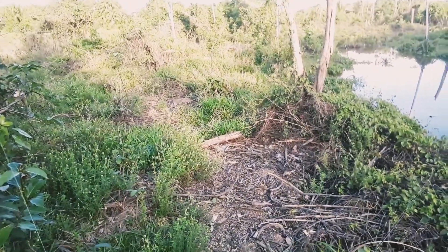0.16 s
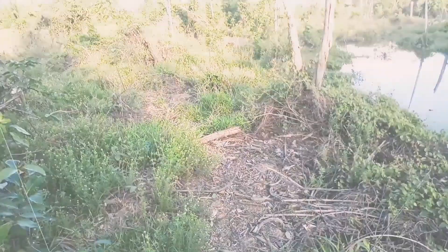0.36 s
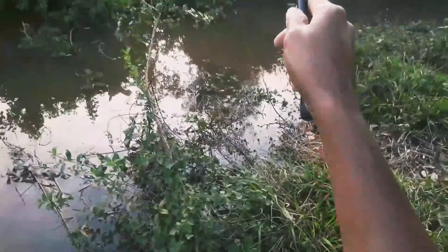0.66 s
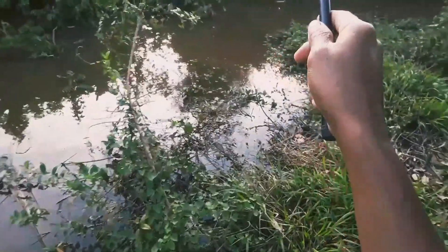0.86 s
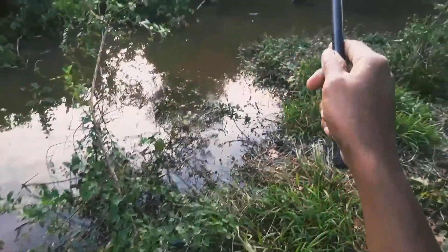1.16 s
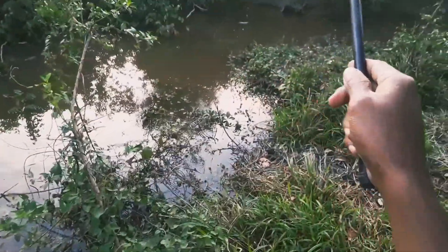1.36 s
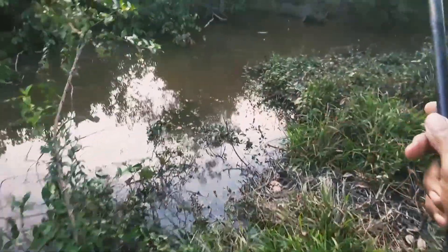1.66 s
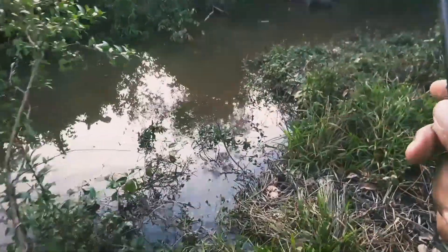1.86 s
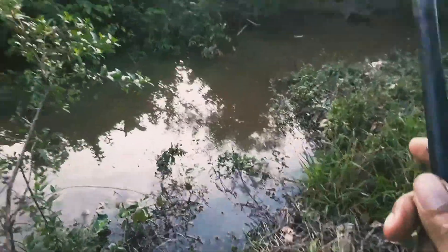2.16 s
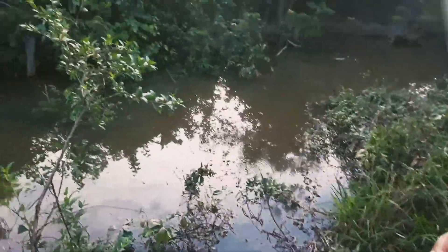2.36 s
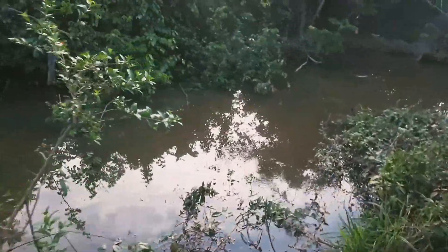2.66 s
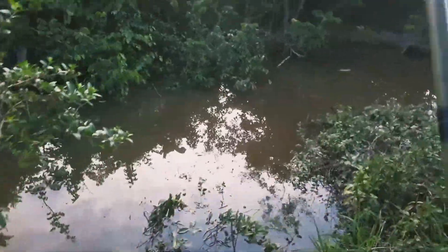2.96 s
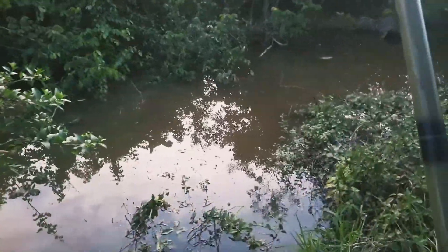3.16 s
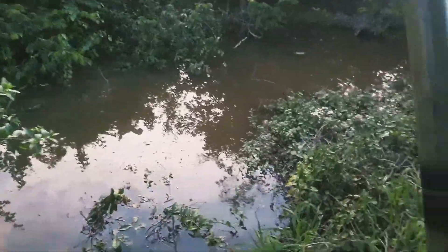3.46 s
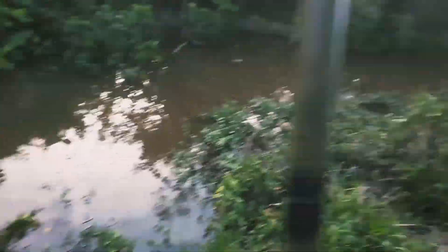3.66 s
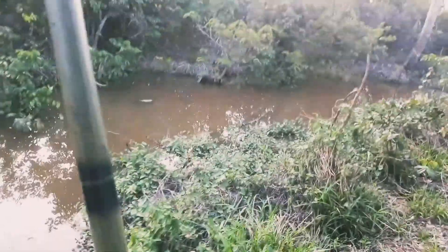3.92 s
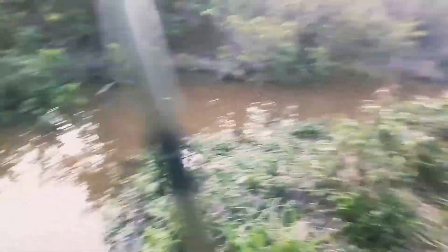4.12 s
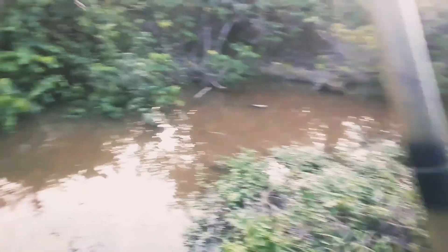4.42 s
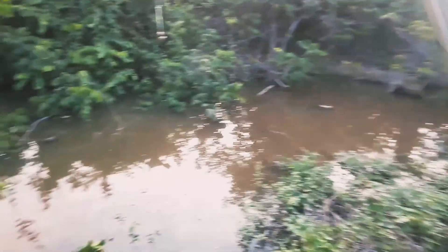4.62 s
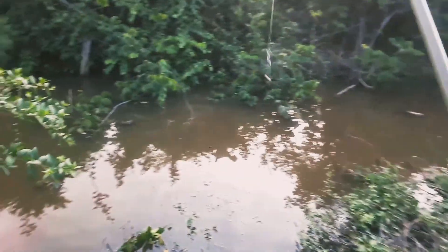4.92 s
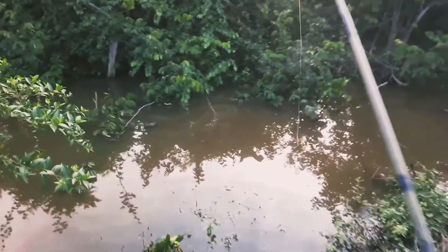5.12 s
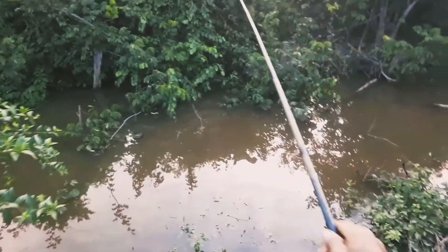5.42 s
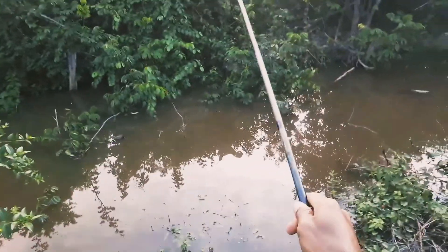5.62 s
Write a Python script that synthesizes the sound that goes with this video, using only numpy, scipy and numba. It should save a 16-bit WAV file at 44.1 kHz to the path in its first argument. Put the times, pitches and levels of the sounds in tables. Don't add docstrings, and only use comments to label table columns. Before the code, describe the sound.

First a soft airy hush with insect chirps and faint bird buzzes; then irregular rustling and crackling of undergrowth on a bank. The snaps cluster heavily in the first two seconds, thin to lighter swishes and ticks, nearly pause after four, and return around five. Distant tyre roar, faint high crickets and small whistles remain behind. Close, centred handheld perspective outdoors, no splashes.

```python
import sys
import numpy as np
from scipy import signal
from scipy.fft import rfft, irfft
from scipy.io import wavfile
from scipy.ndimage import uniform_filter1d
from numba import njit

SR = 44100
rng = np.random.default_rng(int(sys.argv[2]) if len(sys.argv) > 2 else 0)


def magnitude_from_level(level_db):
    exponent = np.asarray(level_db, float) / 20
    return 10 ** exponent


def generate_wav(signal):
    frames = np.transpose(np.atleast_2d(signal))
    scaled = np.clip(frames, -1, 1) * 32767
    pcm = np.round(scaled).astype(np.int16)
    wavfile.write(sys.argv[1], SR, pcm)


N = 255057
TIME = np.arange(N) / SR

# f/Hz, density/dB per Hz
BLADES = [(880, -19), (1500, -2), (1700, -4.5), (2550, -4.5), (2780, -5.5), (3620, -0.5), (4000, -1.5),
          (5690, -0.5), (6270, -2.5), (8330, 2), (9460, -9.5), (13700, 5.5), (15600, -7)]


def level(x, db):
    return x * magnitude_from_level(db) / np.sqrt(np.mean(x ** 2))


def noise():
    return rng.standard_normal(N)


def curves(table):
    s, *columns = np.transpose(table)
    return [np.interp(TIME, s, c) for c in columns]


def colour(x, points):
    hz, db = np.transpose(points)
    bins = np.maximum(np.fft.rfftfreq(N, 1 / SR), 1)
    gain = magnitude_from_level(np.interp(np.log(bins), np.log(hz), db))
    return irfft(rfft(x) * gain, N)


@njit
def svf(x, hz, width):
    y, b, l = np.empty(len(x)), 0., 0.
    for i in range(len(x)):
        g, k = np.tan(np.pi * hz[i] / SR), width[i] / hz[i]
        v = (b + g * (x[i] - l)) / (1 + g * (g + k))
        b, l, y[i] = 2 * v - b, l + 2 * g * v, k * v
    return y


def band(x, hz, width):
    hz, width = hz * np.ones(len(x)), width * np.ones(len(x))
    return svf(svf(x, hz, width), hz, width)


def walk(rate):
    k = int(SR / rate)
    held = np.repeat(rng.standard_normal(N // k + 1), k)
    return 1.413 * uniform_filter1d(uniform_filter1d(held, k), k)[:N]


def span(start, end):
    first = int(max(start, 0) * SR)
    return first, np.linspace(0, 1, max(min(int(end * SR), N) - first, 2))


def arch(u, a, b, c):
    return a + (4 * b - 3 * a - c) * u + 2 * (a + c - 2 * b) * u ** 2


def add(out, first, sound):
    out[first:first + len(sound)] += sound[:len(out) - first]


def quiet_air():
    # f/Hz, density/dB per Hz
    air = [(30, -20.5), (80, 9.5), (200, -15.5), (480, 3), (900, 1.5), (1500, -12), (2500, -26),
           (5000, -21.5), (9000, -34), (15500, -23.5)]
    edged = [(15, -60)] + air + [(16500, -70)]
    return level(colour(noise(), edged), -61.5) * magnitude_from_level(0.35 * walk(3.4))


def road():
    # t/s, roar level/dB, roar centre f/Hz, openness of the way over the bank level/dB
    traffic = [(0.7, -52.5, 842, -59), (0.85, -46.5, 796, -50.5), (1.23, -47.5, 748, -55.5),
               (1.5, -42, 700, -58.5), (1.72, -42, 721, -51), (1.88, -47, 742, -53),
               (2.15, -42.5, 766, -58.5), (2.34, -45, 855, -69.5), (2.52, -42, 744, -72.5),
               (2.7, -47, 757, -59), (3.09, -47, 831.4, -61.5), (3.73, -44.5, 808, -63.5),
               (4.13, -42.5, 738, -62.5), (4.35, -43.5, 843, -53), (4.49, -43, 767, -59.5),
               (4.74, -45, 901, -51.5), (5.17, -44, 686, -53), (5.5, -46.5, 776, -49.5)]
    # t/s, level/dB
    engines = [(0.68, -55), (1.11, -49.5), (1.89, -49.5), (1.98, -47), (2.06, -53), (4.09, -52.5),
               (4.59, -50.5), (5.7, -51.5)]
    roar_db, hz, open_db = curves(traffic)
    width = 345.6 + 51.8 * np.maximum(TIME - 3, 0)
    roar = band(noise(), hz * (1 + 0.0388 * walk(7.3)), width) / np.sqrt(width)
    roar = level(roar, 1.2) * magnitude_from_level(roar_db + 1.3 * walk(18))
    upper = level(band(noise(), 1259.4, 525), 0.27) * magnitude_from_level(open_db + walk(8.5))
    lorry_db = -58.5 + 1.3875 * TIME
    lower = level(band(noise(), 431.6, 586), 3.03) * magnitude_from_level(lorry_db + 0.76 * walk(7.4))
    rumble = band(band(noise(), 92 * (1 + 0.0104 * walk(3.1)), 82.9), 116.0, 381)
    rumble = level(rumble, 0.1) * magnitude_from_level(curves(engines)[0] + 0.377 * walk(8.7))
    return roar + upper + lower + rumble


def crickets():
    # f/Hz, width/Hz, level/dB
    chorus = [
        (7349, 994, -69.5),
    ]
    # first chirp t/s, period/s, length/s, f/Hz, level/dB
    singers = [
        (0.67, .4515, 0.232, 7602, -65),
        (3.648, .465, 0.159, 7400, -73),
    ]
    # start t/s, length/s, f/Hz, level/dB
    strays = [(0, 0.305, 7086, -65.5), (0, 0.221, 7470, -63.5), (0.239, 0.206, 7506, -52),
              (0.294, 0.136, 6960, -60), (1.25, 0.143, 7053, -69.5), (2.402, 0.15, 6880, -69),
              (2.305, 0.066, 7040, -71.5), (3.433, 0.276, 6973, -69), (4.596, 0.22, 6947, -74),
              (5.658, 0.143, 7016, -65.5)]
    strokes_hz, wing_width_hz = 49.5, 140
    out = sum(level(band(noise(), hz, width), db) * magnitude_from_level(2.0 * walk(5)) for hz, width, db in chorus)
    steady = [(s, length, hz, db + 1.6 * (s - 3)) for first, period, length, hz, db in singers
              for s in np.arange(first, N / SR, period)]
    for s, length, hz, db in steady + strays:
        first, u = span(s, s + length)
        strokes = np.sin(np.pi * strokes_hz * length * u) ** 2 + .25
        pitch = hz * (1 + .018 * (np.sqrt(u) - .7))
        shimmer = level(band(rng.standard_normal(len(u)), pitch, 1.6 * wing_width_hz), 0)
        wing = 1.19 * np.sin(2 * np.pi * np.cumsum(pitch) / SR) + shimmer
        overtone = wing ** 2 - uniform_filter1d(wing ** 2, size=40)
        wing = wing + 0.035 * overtone
        swell = np.sin(np.pi * (.06 + .9 * u) ** 1.4) ** .35
        add(out, first, level(wing * strokes * swell, db))
    return out


def whistles(waver):
    # start t/s, end t/s, f/Hz at start, f/Hz at end, level/dB
    slides = [(.588, .632, 3130, 2330, -62), (.72, .795, 3600, 3550, -65), (.84, .875, 4170, 4800, -66),
              (.905, 1.01, 4970, 4880, -63.5), (1.005, 1.068, 4890, 4210, -61),
              (.875, 1.0, 3270, 3200, -63.5), (1.255, 1.275, 2730, 2370, -59),
              (1.457, 1.49, 2980, 2330, -59), (1.503, 1.54, 4960, 3700, -61),
              (1.675, 1.702, 3480, 3120, -60), (1.93, 2.0, 4840, 4690, -66), (2.05, 2.075, 4110, 3560, -59),
              (.668, .682, 3330, 3480, -48.5), (.676, .696, 3680, 3520, -45), (.69, .718, 3600, 2950, -54),
              (4.19, 4.35, 2050, 2200, -69), (4.8, 4.92, 2380, 2130, -68.5), (1.483, 1.5, 6250, 5700, -63),
              (1.665, 1.68, 3100, 3500, -62), (1.418, 1.436, 2400, 3100, -64),
              (1.43, 1.467, 3120, 3120, -61), (1.955, 1.975, 3000, 3300, -58)]
    arches = [
        (.69, .88, 2320, 2160, -58),
        (1.558, 1.717, 2300, 2300, -57),
    ]
    out = np.zeros(N)
    bowed = [(note, 60) for note in slides] + [(note, 430) for note in arches]
    for (s, end, a, c, db), bow in bowed:
        first, u = span(s, end)
        hump = np.abs(np.sin(np.pi * u))
        pitch = a + (c - a) * u + bow * hump ** .6
        tone = np.sin(2 * np.pi * np.cumsum(pitch) / SR) * magnitude_from_level(1.97 * waver[first:first + len(u)])
        add(out, first, level(tone * hump ** .3, db))
    return out


def buzzes(waver):
    # start t/s, end t/s, f/Hz at start, f/Hz at end, level/dB
    narrow = [(.125, .23, 5550, 5950, -62), (.07, .14, 5200, 5600, -76), (.18, .44, 5800, 5700, -61),
              (.13, .23, 4540, 4580, -74), (0, .055, 2110, 2110, -68), (.06, .12, 2170, 2150, -75),
              (0, .13, 4800, 5150, -77), (4.085, 4.115, 2150, 2200, -65), (5.22, 5.45, 5450, 5450, -71),
              (4.19, 4.37, 2200, 2260, -71), (4.8, 4.92, 2400, 2130, -70), (5.5, 5.61, 2180, 2200, -66),
              (5.53, 5.56, 2850, 3000, -68)]
    rasps = [
        (.45, .54, 4300, 3300, -65),
        (1.4, 1.505, 3600, 3450, -58),
        (1.43, 1.495, 3850, 3800, -59),
    ]
    out = np.zeros(N)
    shaped = [(note, 0, .055) for note in narrow] + [(note, 430, .13) for note in rasps]
    for (s, end, a, c, db), bow, share in shaped:
        first, u = span(s, end)
        buzz = band(rng.standard_normal(len(u)), arch(u, a, (a + c) / 2 + bow, c), share * a)
        swell = np.sin(np.pi * (.04 + .96 * u) ** .7) ** .6
        add(out, first, level(buzz * swell * magnitude_from_level(1.5 * waver[first:first + len(u)]), db + 1))
    return out


def birds():
    waver = walk(65.0)
    calls = whistles(waver) + buzzes(waver)
    t = np.arange(6000) / SR
    trees = level(rng.standard_normal(len(t)) * np.exp(-t / .04), -52)
    return magnitude_from_level(-3.5) * (calls + signal.fftconvolve(calls, trees)[:N])


def sweeps():
    swishes = [(0.452, 0.046, -57.5, 2), (0.518, .04, -56.5, -0.5), (0.574, 0.099, -51, -2),
               (0.769, 0.033, -61.5, 4.5), (0.659, 0.0133, -56.5, 6.5), (0.841, 0.199, -56.5, 2.5),
               (1.035, 0.0766, -60.5, 5.5), (1.22, 0.042, -63.5, 4), (1.434, 0.157, -66.5, 5),
               (1.716, 0.102, -49.5, 3.5), (1.809, 0.122, -49.5, 1), (1.963, 0.148, -57, 2.5),
               (2.172, 0.055, -64, -1), (2.285, 0.1, -58, -2), (2.517, 0.027, -61.5, -1.5),
               (2.62, 0.068, -52.5, -2), (2.711, 0.0847, -47, -4), (2.906, 0.213, -62.5, -2.5),
               (3.142, 0.0116, -53.5, -7), (3.269, 0.05, -65, -8.5), (3.457, 0.095, -63.5, -4),
               (3.58, 0.177, -56.5, -5.5), (3.809, 0.074, -50.5, -3.5), (3.901, 0.052, -55.5, -4),
               (4.004, 0.169, -61, -4), (4.11, 0.0815, -56.5, -5), (4.365, 0.15, -70.5, 7),
               (4.794, 0.012, -66, 2.5), (4.916, .05, -58, 2.5), (4.97, 0.072, -51, -5.5),
               (5.131, 0.0182, -50.5, -7.5), (5.323, 0.029, -51, -6.5), (5.453, 0.008, -48, -8),
               (5.544, 0.025, -87.5, -6), (5.697, 0.019, -65.5, -4)]
    rise_db_per_s, fall_db_per_s = 401, 230.5
    settle_db, settle_db_per_s, rest_db = -8.5, 44, -71.5
    top, body = magnitude_from_level(2 * rest_db), magnitude_from_level(2 * rest_db)
    for s, hold, db, full_db in swishes:
        after = np.maximum(TIME - s - hold, 0)
        fall = magnitude_from_level(-2 * fall_db_per_s * after) + magnitude_from_level(2 * (settle_db - settle_db_per_s * after))
        power = magnitude_from_level(2 * (db - rise_db_per_s * np.maximum(s - TIME, 0))) * fall
        top, body = top + power, body + power * magnitude_from_level(2 * full_db)
    return np.sqrt(top), np.sqrt(body)


def rustle():
    sizes = magnitude_from_level(np.minimum(5.5 * rng.exponential(size=N), 10))
    ticks = (rng.random(N) < 1200 / SR) * sizes
    grains = signal.lfilter([1], [1, -np.exp(-1 / (0.0005 * SR))], ticks) * noise()
    mixed = level(grains, -3) + level(noise(), -3)
    blades = colour(mixed, BLADES[:-1]) * magnitude_from_level(1.2 * walk(40))
    top = signal.sosfilt(signal.butter(4, 8800, "high", fs=SR, output="sos"), blades)
    body = signal.sosfilt(signal.butter(4, 8800, "low", fs=SR, output="sos"), blades)
    top_gain, body_gain = sweeps()
    return level(top, .6) * top_gain + level(body, 2.5) * body_gain * magnitude_from_level(1.1 * walk(25))


def fracture(grit, t, hz, decay):
    burst = grit * (np.exp(-t / decay) + .1 * np.exp(-t / .009))
    burst = burst * np.minimum(t / (.15 * decay), 1)
    burst = burst + 2.5 * (np.arange(len(t)) == int(.15 * decay * SR))
    ring = 1.2 * svf(burst, hz + 0 * t, 1500 + 0 * t) + band(burst, hz, 2120) + 1.12 * band(burst, 6290, 4070)
    return ring, band(burst, 3315, 2910), band(burst, 933, 1625), band(burst, 12800, 9900)


def snaps():
    # t/s, peak level/dB, body and top crack relative level/dB
    stalks = [(0.1246, -43.5, -33, -30.5), (0.546, -33, -48, -4), (0.631, -32, -16.5, -16),
              (0.7999, -28, -33.5, -22.5), (1.2309, -40, 4, -19), (1.5523, -39.5, 4, -18),
              (1.9698, -21, -30.5, -17), (2.217, -36.5, -27.5, -23), (2.6444, -45, -18, -17),
              (2.7197, -32.5, 4, -8), (2.7516, -42, -18, -16), (2.8083, -28.5, -29, -18.5),
              (3.0016, -36.5, 0, -23.5), (3.575, -32, -7.5, -16.5), (3.9094, -46, -8.5, -14),
              (4.7989, -37, -4.5, -15.5), (4.9113, -46.5, -17, -12), (4.9619, -33, -19, -21.5),
              (5.021, -31, -22.5, -12.5), (5.123, -28.5, -11, -14.5), (5.1817, -34.5, -5.5, -1),
              (5.3348, -46, -7, -8.5), (5.3755, -35, -8.5, -9.5), (5.399, -33, -2, -20.5),
              (5.5552, -46.5, 8.5, -28), (5.7173, -36.5, -2, -22.5)]
    # t/s, peak level/dB, ring f/Hz, body and top crack relative level/dB
    stems = [(1.1047, -29.5, 6640, -29.5, -25.5), (1.5008, -34.5, 4000, -2.5, -23.5),
             (1.5664, -38, 4200, 2, -25), (1.7122, -33.5, 3720, -6.5, -10.5),
             (1.762, -20, 4450, -19.5, -26.5), (1.8813, -36, 4540, -3, -5.5),
             (1.941, -35, 3250, -14.5, -16), (2.097, -31.5, 5230, -14.5, 0),
             (2.7815, -33, 3660, -21.5, -17), (4.375, -42, 3900, -10.5, -25),
             (4.632, -47, 3400, -8.5, -25.5), (4.922, -33.5, 4880, -16.5, -20)]
    # t/s, peak level/dB, ring f/Hz, body relative level/dB, length of the break/ms
    twigs = [(.7585, -26, 5800, -6, 1.3), (.8655, -26, 8200, -14, 3), (.9632, -33, 3150, -8, 1.5),
             (.994, -35, 7700, -14, 2.2), (1.0112, -28, 5300, -10, 1.5), (1.7482, -21, 5600, -5, 3.2),
             (1.8368, -19.5, 3950, -10, 3.6), (1.9011, -30, 6900, -8, .8), (1.9146, -6.5, 3900, -18, .45),
             (2.0108, -25, 7800, -4, 1.2), (3.1308, -27, 8100, -3, .9), (3.1312, -35, 4200, -6, .9),
             (5.4517, -27, 8000, 1, 1.0)]
    # t/s, peak level/dB
    treble_ticks = [(0.5596, -36.5), (0.5846, -41.5), (0.8629, -32), (0.8934, -44), (0.9627, -43.5),
                    (1.0113, -37.5), (1.694, -45.5), (1.748, -26.5), (1.7816, -32), (1.8376, -19), (1.914, -26.5),
                    (1.9262, -34), (2.0091, -36.5), (2.0522, -44.5), (2.1919, -45), (2.2175, -37), (2.3106, -44),
                    (2.5114, -46.5), (2.5406, -48), (2.617, -47), (2.7813, -32), (2.9148, -41), (3.1301, -40),
                    (3.1284, -41), (3.1534, -46.5), (3.2939, -44.5), (3.4496, -50.5), (3.5234, -50.5),
                    (3.6331, -45), (3.657, -39), (3.7165, -42.5), (3.8217, -42.5), (3.9246, -39.5), (3.9534, -44),
                    (3.9787, -44.5), (4.0113, -45), (4.9112, -46.5), (5.0574, -42), (5.4515, -28), (5.4606, -35.5),
                    (5.6645, -51.5)]
    # t/s, peak level/dB, ring f/Hz
    clicks = [(0.831, -51, 4400), (1.1638, -44, 3600), (1.6501, -45, 3070), (1.7274, -34, 4850),
              (1.922, -32, 3070), (2.171, -44, 6050), (2.2755, -44.5, 3910), (2.604, -44, 5970),
              (2.9781, -45.5, 6010), (3.5446, -41.5, 5040), (3.5962, -55.5, 3660), (3.6451, -44.5, 5000),
              (3.8056, -48.5, 3300), (3.88, -44.5, 3680), (4.137, -43.5, 5930), (4.3903, -44, 4030),
              (4.4712, -41.5, 3260), (4.4871, -45.5, 4670), (4.6445, -64, 3060), (4.7491, -46.5, 3240),
              (5.2874, -44, 3100), (5.3935, -40, 3440), (5.4606, -37, 6400)]
    # t/s, peak level/dB
    knocks = [
        (.7588, -29),
        (1.749, -30),
        (1.9149, -20.5),
        (2.011, -31),
        (5.4517, -29),
    ]
    stalk_hz, stalk_ms, onset_s, silent = 7400, 0.505, .0007, -60
    out, t = np.zeros(N), np.arange(2000) / SR
    thin = [(s, db, stalk_hz + 270 * rng.standard_normal(), body, top) for s, db, body, top in stalks]
    # t/s, ring f/Hz, length/ms, peak level/dB, then ring, body, knock, top crack relative level/dB
    table = [(s, hz, stalk_ms, db, 0, body, min(body, -2), top) for s, db, hz, body, top in thin + list(stems)]
    table += [(s, hz, ms, db, 0, body, body - 12, -16) for s, db, hz, body, ms in twigs]
    table += [(s + onset_s, stalk_hz, .7, db + 1, silent, silent, silent, 0) for s, db in treble_ticks]
    table += [(s + onset_s, hz, stalk_ms, db, 0, -8, silent, silent) for s, db, hz in clicks]
    table += [(s, stalk_hz, stalk_ms, db, silent, silent, 0, silent) for s, db in knocks]
    chance = rng.standard_normal((len(table), len(t)))
    for (s, hz, ms, db, *relative_db), grit in zip(table, chance):
        parts = fracture(grit, t, hz, ms / 1000)
        add(out, int(s * SR), sum(magnitude_from_level(db + rel) * p / np.abs(p).max() for p, rel in zip(parts, relative_db)))
    return out


def scene():
    # t/s, level/dB
    fade_out = [
        (0, 6),
        (.25, 2),
        (.35, -5.5),
        (.41, -12),
        (.445, -26),
    ]
    # t/s, level/dB
    fade_in = [
        (.445, -34),
        (.48, -7),
        (.55, 1.5),
        (.68, 6.5),
    ]
    leaving, = curves(fade_out + [(.45, -120)])
    coming, = curves([(.44, -120)] + fade_in)
    hiss = level(colour(noise(), BLADES[:-1]), -83)
    moving = (road() + rustle()) * magnitude_from_level(coming - fade_in[-1][1])
    wildlife = (crickets() + birds()) * (magnitude_from_level(leaving) + magnitude_from_level(coming))
    mono = quiet_air() * magnitude_from_level(leaving) + hiss * magnitude_from_level(coming) + moving + wildlife + snaps()
    return np.array([mono, mono])


def band_limit(x):
    return signal.sosfilt(signal.butter(12, 17170, fs=SR, output="sos"), x)


def record(dry):
    # start t/s, end t/s, share of the treble level/dB
    unlike_moments = [(.54, .56, -14), (.745, .8, -9), (.863, .871, -3), (1.746, 1.753, -3),
                      (1.816, 1.828, -24), (1.908, 1.913, -16), (2.19, 2.23, -18), (3.125, 3.137, -6),
                      (3.97, 4.05, -17), (5.08, 5.12, -22), (5.43, 5.47, -7)]
    cut = signal.sosfilt(signal.ellip(10, .3, 45, 15850, fs=SR, output="sos"), dry)
    above = signal.butter(8, [4600, 15300], "band", fs=SR, output="sos")
    treble = np.sqrt(uniform_filter1d(signal.sosfilt(above, cut[0]) ** 2, size=200) + 1e-18)
    share = sum(magnitude_from_level(db) * ((TIME > start) & (TIME < end)) for start, end, db in unlike_moments)
    quiet = uniform_filter1d(treble, size=3000) < magnitude_from_level(-54)
    unlike = level(signal.sosfilt(above, noise()), 0) * (share * treble + magnitude_from_level(-83.5) * quiet)
    sudden = uniform_filter1d(1. * (treble > magnitude_from_level(-36)), size=300)
    beyond = signal.sosfilt(signal.butter(6, 15900, "high", fs=SR, output="sos"), dry)
    cut = cut + magnitude_from_level(-22) * sudden * beyond
    return band_limit(cut + unlike * np.array([[1], [-1]]))


dry = scene()
out = record(dry)
generate_wav(out)
```